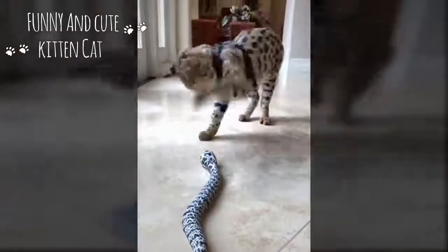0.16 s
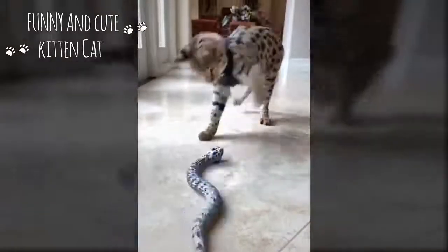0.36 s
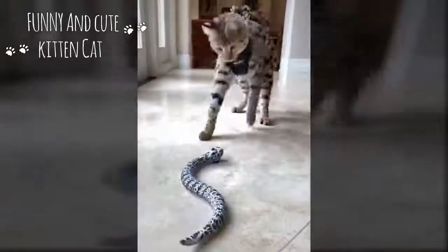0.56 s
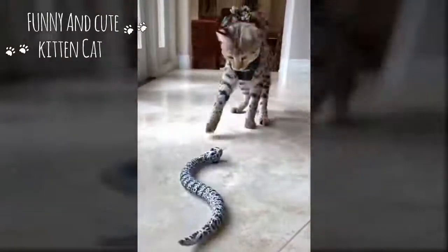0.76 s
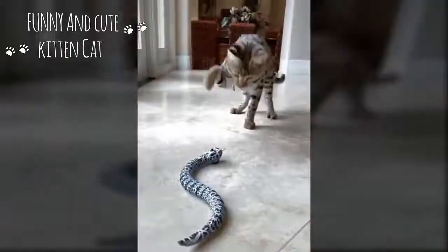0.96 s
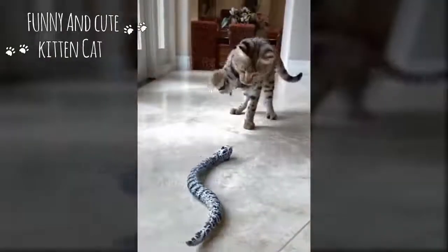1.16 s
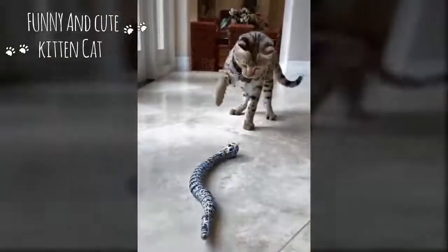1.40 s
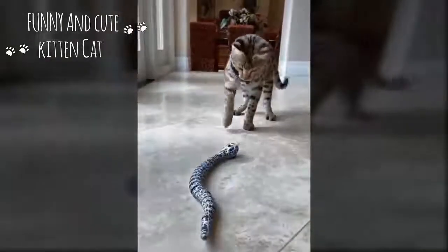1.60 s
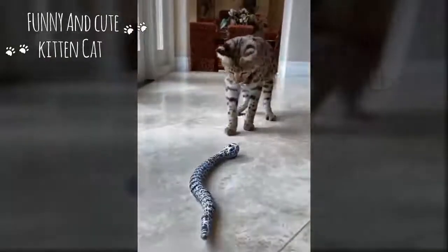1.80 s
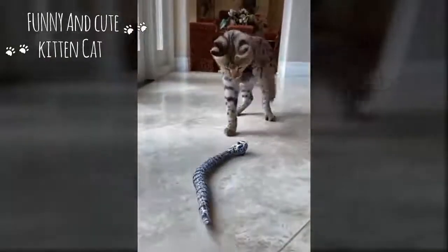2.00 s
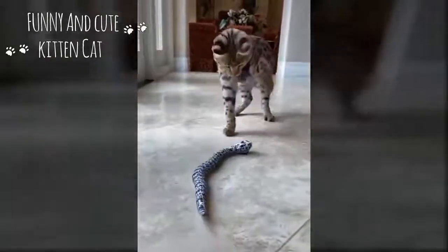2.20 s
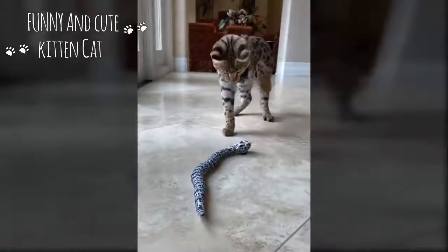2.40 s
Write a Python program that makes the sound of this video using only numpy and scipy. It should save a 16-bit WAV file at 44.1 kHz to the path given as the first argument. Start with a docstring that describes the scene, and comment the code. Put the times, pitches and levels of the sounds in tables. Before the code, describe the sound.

A cat hisses and spits once, then a toy snake rattles twice between remote clicks.

```python
"""A bright, echoing room with a stone floor and a low hum; a remote control is close to the microphone.
Its button clicks, then farther off a cat forces air through its mouth: one hiss ending in a sharp spit.
The button snaps again and a toy snake wriggles across the floor, wheels whirring, plastic joints
rattling, with another click on the way. A claw ticks faintly on the stone.
Then a further click, and the snake makes its second run, the button clicking once more near the end."""
import sys
import numpy as np
from scipy import signal
from scipy.fft import rfft, irfft
from scipy.io import wavfile
from scipy.ndimage import uniform_filter1d

SR = 44100
rng = np.random.default_rng(int(sys.argv[2]) if len(sys.argv) > 2 else 0)


def dump_mix(stems):
    """Bounce the given channels to the path in sys.argv[1] as a 16-bit WAV at rate SR."""
    frames = np.atleast_2d(stems).T  # one column per channel
    limited = np.clip(frames, -1, 1)  # hard clip at full scale
    pcm = np.round(limited * 32767).astype(np.int16)
    wavfile.write(sys.argv[1], SR, pcm)


N = 105840
TIME = np.arange(N) / SR
BIN_HZ = np.arange(N // 2 + 1) * SR / N


def from_db(db):
    """Decibels to gain."""
    return 10 ** (np.asarray(db) / 20)


def rms_one(x):
    """Scale to unit power."""
    return x / np.sqrt(np.mean(x ** 2) + 1e-20)


def at_hz(points, hz):
    """Read a table on a log-frequency axis."""
    freqs, values = np.transpose(points)
    return np.interp(np.log(np.maximum(hz, 1)), np.log(freqs), values)


def level(curve):
    """Gain from a (time [s], level [dB]) curve, silent outside it."""
    times, db = np.transpose(curve)
    return from_db(np.interp(TIME, times, db)) * (TIME >= times[0]) * (TIME <= times[-1])


def colour(x, spectrum):
    """Causal filter shaped like this spectrum; white noise keeps its power."""
    gain = rms_one(from_db(at_hz(spectrum, BIN_HZ)))
    cepstrum = irfft(np.log(gain), N)
    cepstrum[1:N // 2] *= 2  # fold to minimum phase
    cepstrum[N // 2 + 1:] = 0
    impulse = irfft(np.exp(rfft(cepstrum)), N)[:N // 10]
    return signal.fftconvolve(x, impulse)[:N]


def decay(start, t60):
    """Envelope that jumps to 1 at the start and falls 60 dB in t60 seconds."""
    return (TIME >= start) * from_db(-60 * np.clip((TIME - start) / t60, 0, 4))


def ring(start, hz, db, t60):
    """A dying sine."""
    return from_db(db) * decay(start, t60) * np.sin(2 * np.pi * hz * (TIME - start))


def strike(modes, start, db):
    """Several modes struck together, alternating in polarity."""
    return sum((-1) ** k * ring(start, hz, db + mode_db, t60)
               for k, (hz, mode_db, t60) in enumerate(modes))


def bursts(rows, attack_s=1 / SR):
    """Dying bursts of noise from (time [s], level [dB], t60 [s]) rows."""
    power = sum((from_db(db) * decay(start, t60)) ** 2 for start, db, t60 in rows)
    lag = np.exp(-1 / (attack_s * SR))
    return np.sqrt(signal.lfilter([1 - lag], [1, -lag], power)) * rng.standard_normal(N)


def background():
    """Room tone: low rumble, faint air and a steady hum."""
    # colour of the room tone: (frequency [Hz], relative level [dB])
    spectrum = [(25, -27.5), (45, -6), (65, 0.5), (110, -7), (400, -17), (1200, -24), (3000, -25.5),
                (5000, -34.5), (13000, -42.5)]
    air_db, hum_db, hum_hz = -64, -73.5, 250.5
    air = from_db(air_db) * colour(rng.standard_normal(N), spectrum)
    return air + from_db(hum_db) * np.sin(2 * np.pi * hum_hz * TIME)


def room(x):
    """Diffuse reverberation, a little dulled by the walls; the treble dies first."""
    # reverberation time: (frequency [Hz], t60 [s])
    decay_times = [(300, 1), (2500, 0.6), (5000, 0.64), (9000, 0.39), (13000, 0.26)]
    delay_s, wall_cut_hz = .00508, 9700
    white = rfft(rng.standard_normal(N))
    edges_hz = np.geomspace(100, 16000, 24)
    tail = 0
    for low, high in zip(edges_hz, edges_hz[1:]):
        band = irfft(white * (BIN_HZ >= low) * (BIN_HZ < high), N)
        tail += band * decay(delay_s, at_hz(decay_times, np.sqrt(low * high)))
    response = rfft(tail)
    power = uniform_filter1d(np.abs(response) ** 2, size=240)
    flat_tail = irfft(response / np.sqrt(power + power.mean() / 20), N)[:N // 2]  # evens the spectrum
    dull = signal.sosfilt(signal.butter(1, wall_cut_hz, fs=SR, output="sos"), x)
    return signal.fftconvolve(dull, flat_tail / np.sqrt(np.sum(flat_tail ** 2)))[:N]


def button():
    """Each click is a dry crack that rings the springy contact and, just after, the remote's case."""
    # clicks: (time [s], snap gain [dB], ping [dB], case gain [dB], crack [dB], notch depth [0-1])
    clicks = [(0.095, -23, -42.5, -10.5, -39, 0.01), (.9042, 3.5, -21.5, 2.5, -24.5, .9),
              (1.0716, -18, -43, 4.5, -27.5, 0), (1.6157, 0.5, -20.5, 0, -23.5, 0.04),
              (1.9547, -5, -35, 5.5, -36, 0.04)]
    # modes of the snapping contact: (frequency [Hz], level [dB], t60 [s])
    snap_modes = [(5700, -22.5, 0.0071), (6320, -22.5, 0.0069), (6890, -24, 0.0091), (8720, -31, 0.0072)]
    # modes of the remote's case: (frequency [Hz], level [dB], t60 [s])
    case_modes = [(697, -35.5, 0.027), (1028, -43.5, .021), (1400, -46.5, .014), (1900, -30.5, 0.015)]
    # colour of the crack: (frequency [Hz], relative level [dB])
    crack_colour = [(400, -14), (950, -7), (1250, -12.5), (1900, -2), (3000, -9), (4400, -3), (6300, 2.5),
                    (8500, -6), (13000, -15.5)]
    crack_t60_s, knock_delay_s = .015, .00045
    # the recorder's processing cuts 2-4 kHz from one click and leaves a faint 2.1 kHz ring
    notch = signal.butter(4, (2150, 4150), "bandstop", fs=SR, output="sos")
    out = 0
    for start, snap_db, ping_db, case_db, crack_db, notch_depth in clicks:
        crack = colour(bursts([(start, crack_db, crack_t60_s)]), crack_colour)
        spring_ping = ring(start, hz=4386, db=ping_db, t60=.019)
        snap = strike(snap_modes, start, snap_db)
        knock = strike(case_modes, start + knock_delay_s, case_db)
        click = crack + spring_ping - snap + knock
        notched = signal.sosfilt(notch, click) + ring(start, hz=2130, db=-42, t60=.099)
        out += (1 - notch_depth) * click + notch_depth * notched
    return out


def singing_shell():
    """Under load the toy's gears rub two narrow resonances of its shell into ringing."""
    # ringing while the gears strain: (time [s], level [dB])
    strain = [(1.0, -44), (1.045, -40.5), (1.09, -39.5), (1.113, -33.5), (1.125, -51)]
    width_hz = 170

    def resonance(hz, db):
        b, a = signal.iirpeak(hz, hz / width_hz, fs=SR)
        band = signal.lfilter(b, a, rng.standard_normal(N))
        return from_db(db) * rms_one(signal.lfilter(b, a, band))
    return level(strain) * rms_one(resonance(hz=3930, db=-1.5) + resonance(hz=4600, db=-2.5))


def toy_snake():
    """Wheels whirr and the belly scuffs; uneven gear ticks and joint clacks sound through the shell."""
    # drive of the toy, one curve a run: (time [s], level [dB])
    runs = [
        [(.934, -49), (.94, -36.5), (.965, -40.5), (1.0, -33), (1.075, -28), (1.13, -33), (1.21, -32),
         (1.28, -45)],
        [(1.695, -62), (1.715, -43), (1.74, -41), (1.775, -35), (1.87, -32), (1.95, -30), (1.985, -34.5),
         (2.04, -46), (2.11, -90)],
    ]
    # loudest clacks of the joints: (time [s], level [dB])
    joint_hits = [(0.987, -30), (0.993, -31), (1.0014, -22.5), (1.0092, -30), (1.0138, -26.5), (1.022, -31),
                  (1.0446, -24.5), (1.052, -28), (1.081, -25.5), (1.0905, -29), (1.131, -32),
                  (1.145, -23.5), (1.156, -26.5), (1.1674, -29.5), (1.196, -34), (1.201, -27.5),
                  (1.209, -25), (1.214, -35), (1.7657, -36), (1.772, -29.5), (1.7779, -30), (1.786, -34),
                  (1.8205, -23), (1.853, -29), (1.8926, -30.5), (1.9061, -28), (1.9284, -37), (1.9332, -29),
                  (1.938, -26), (1.946, -26), (1.9543, -25.5), (1.966, -29.5)]
    # resonances of the plastic shell: (frequency [Hz], relative level [dB])
    shell_colour = [(300, -33), (1300, -34.5), (1700, -14.5), (2100, -4.5), (2450, 0.5), (3050, -10),
                    (3550, -2.5), (3930, 2), (4250, -3.5), (4700, 1.5), (5300, -5), (6200, -10), (7800, -9),
                    (8500, 0), (9250, -3.5), (10200, -15), (13000, -29.5)]
    # rub of wheels and gears: (frequency [Hz], relative level [dB])
    wheel_colour = [(300, -25), (1300, -23), (1700, -15.5), (2100, -5.5), (2450, -5), (3050, -5.5),
                    (3600, -4), (3950, -2), (4250, -1.5), (4700, -1.5), (5300, -5.5), (6200, -8.5),
                    (7800, -7.5), (8500, -3), (9250, -3), (10200, -11), (13000, -20)]
    # belly on the floor as the toy starts and settles: (time [s], level [dB], t60 [s])
    scuffs = [(1.255, -47, 0.19), (1.7155, -43.5, 0.019), (2.008, -46, 0.33), (2.068, -48.5, 0.19)]
    # colour of the scuffs: (frequency [Hz], relative level [dB])
    scuff_colour = [(300, -18.5), (1400, -17.5), (2500, 1), (3200, 1), (4500, -18), (12000, -32)]
    ticks_per_s, tick_jitter, clack_t60_s = 145, .28, .016
    rattle_db, whirr_db = -10.5, -10  # relative to the drive
    drive = sum(level(run) for run in runs)
    gaps_s = np.exp(tick_jitter * rng.standard_normal(SR // 20)) / ticks_per_s
    ticks = np.histogram(np.cumsum(gaps_s), N, (0, N / SR))[0]
    tick_envelope = signal.fftconvolve(ticks, decay(0, t60=.012))[:N]
    rattle = from_db(rattle_db) * drive * rms_one(tick_envelope * rng.standard_normal(N))
    clacks = bursts([(start, db, clack_t60_s) for start, db in joint_hits], attack_s=.00062)
    whirr = colour(from_db(whirr_db) * drive * rng.standard_normal(N), wheel_colour)
    shell = singing_shell() + colour(rattle + clacks, shell_colour)
    return whirr + shell + colour(bursts(scuffs), scuff_colour)


def cat_hiss():
    """Air rushes through a widening mouth: a puff, the hiss, then the spit."""
    # brief ring of the opening puff: (time [s], frequency [Hz], level [dB], t60 [s])
    puff_modes = [(.1995, 1597, -33, 0.041), (.1995, 1980, -36.5, 0.086), (0.203, 124, -44, 0.082)]
    # force of the breath: (time [s], level [dB])
    breath = [(.197, -57.5), (.201, -32.5), (.212, -24), (.225, -36.5), (.240, -42), (.252, -28.5),
              (.285, -32), (.311, -35), (.318, -30), (.335, -30), (.36, -31), (.395, -59.5)]
    # mouth half open: (frequency [Hz], relative level [dB])
    narrow_mouth = [(200, -26), (1300, -22.5), (1900, -10), (2550, 3), (3300, -6.5), (4000, -0.5),
                    (5500, -10), (9000, -12), (11000, -22), (13000, -25)]
    # mouth wide open: (frequency [Hz], relative level [dB])
    wide_mouth = [(200, -25.5), (600, -21.5), (1000, -12), (1700, -12), (2450, 3), (3150, 1.5), (3750, 0),
                  (4600, 0), (5700, 1.5), (7200, -3.5), (9700, -1), (10600, -13), (13000, -13.5)]
    # wet smacks of the spit: (time [s], level [dB], t60 [s])
    spits = [(.3264, -12.5, 0.0084), (.3292, -13, 0.024), (.3326, -17, 0.0098), (.4335, -35, 0.029)]
    opens_at_s, opening_s = .3164, .02
    air = level(breath) * rng.standard_normal(N)
    wide = np.clip((TIME - opens_at_s) / opening_s + .5, 0, 1)
    puff = sum(ring(*mode) for mode in puff_modes)
    return puff + colour(air * (1 - wide), narrow_mouth) + colour(air * wide + bursts(spits), wide_mouth)


def cat_claw():
    """A paw comes down and one claw ticks on the stone."""
    # the tick: (time [s], level [dB], t60 [s])
    tick = [(1.463, -59.5, 0.0432)]
    # its colour: (frequency [Hz], relative level [dB])
    tick_colour = [(1000, -21), (8000, -3), (13000, -23)]
    return colour(bursts(tick), tick_colour)


def scene():
    """Cat and toy are out in the room; the remote, next to the microphone, is much drier."""
    cat_room_db, toy_room_db, button_room_db = -11, -11, -24.5
    cat, toy, clicks = cat_hiss() + cat_claw(), toy_snake(), button()
    echo = room(from_db(cat_room_db) * cat + from_db(toy_room_db) * toy + from_db(button_room_db) * clicks)
    return (background() + echo + clicks + toy + cat)[None]


def record(dry):
    """The recorder rounds only the highest peaks and cuts the top treble steeply."""
    peak_limit, cutoff_hz = .34, 13050
    rounded = dry / (1 + (dry / peak_limit) ** 6) ** (1 / 6)
    return signal.sosfilt(signal.ellip(10, .1, 70, cutoff_hz, fs=SR, output="sos"), rounded)


dry = scene()
out = record(dry)
dump_mix(out)
```